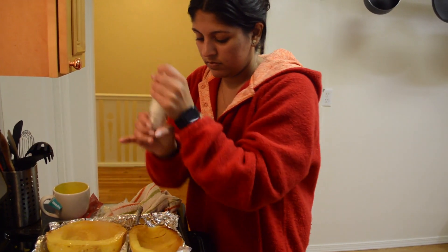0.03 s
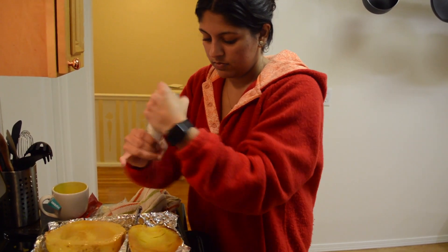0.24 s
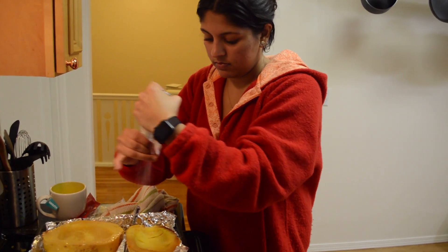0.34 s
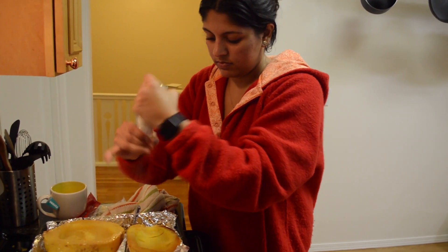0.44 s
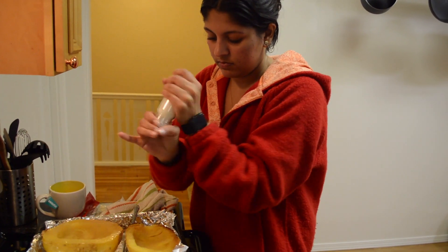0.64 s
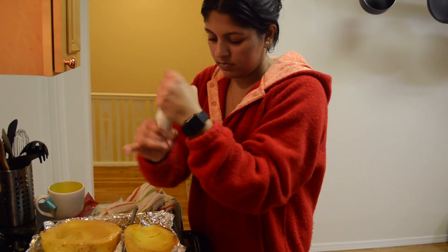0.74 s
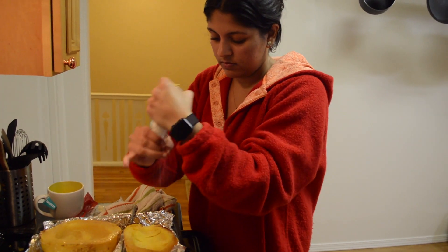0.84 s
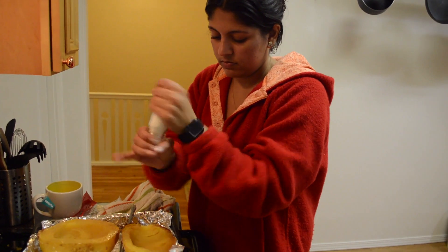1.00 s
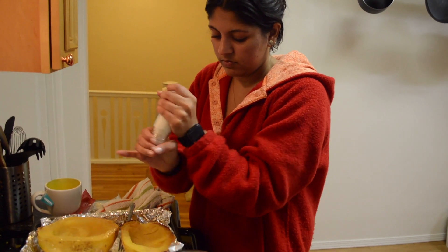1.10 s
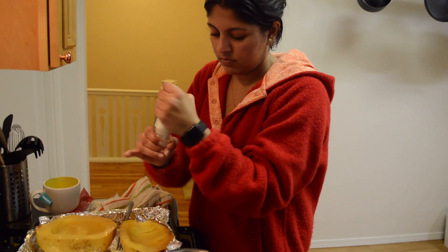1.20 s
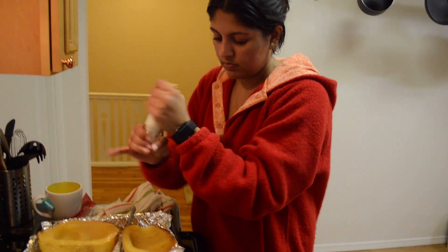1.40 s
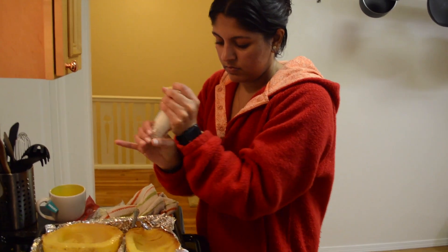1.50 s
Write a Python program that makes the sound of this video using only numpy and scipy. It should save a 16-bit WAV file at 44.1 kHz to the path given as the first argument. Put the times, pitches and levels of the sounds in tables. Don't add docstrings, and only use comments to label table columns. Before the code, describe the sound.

Gritty crunches of salt in a hand-twisted grinder, with loose grains ticking between turns in a kitchen

```python
import sys
import numpy as np
from scipy import signal
from scipy.fft import rfft, irfft
from scipy.io import wavfile
from scipy.ndimage import uniform_filter1d

SR = 44100
rng = np.random.default_rng(int(sys.argv[2]) if len(sys.argv) > 2 else 0)


def wav_record(signal):
    frames = np.transpose(np.atleast_2d(signal))
    bounded = np.clip(frames, -1, 1)
    quanta = np.round(bounded * 32767).astype(np.int16)
    wavfile.write(sys.argv[1], SR, quanta)


def field_ratio(decibels):
    return 10 ** (np.asarray(decibels, dtype=float) / 20)


N = 68355


def unit(x):
    return x / np.sqrt(np.mean(x ** 2))


def ring(x, hz, width_hz):
    hz = min(hz, SR / 2.2)
    q = max(hz / width_hz, 0.5)
    return signal.lfilter(*signal.iirpeak(hz, q, fs=SR), x)


def colour(x, outline):
    hz, db = np.array(outline, float).T
    f = np.maximum(np.fft.rfftfreq(4096, 1 / SR), 1)
    log_gain = np.interp(np.log(f), np.log(hz), db) * np.log(10) / 20
    cepstrum = irfft(log_gain)
    cepstrum[1:2048] *= 2
    cepstrum[2049:] = 0
    response = irfft(np.exp(rfft(cepstrum)))
    return signal.fftconvolve(x, response)[:len(x)]


def grit(shape, per_s, spread_db):
    chance = rng.random(shape)
    sign = rng.standard_normal(shape)
    size = np.minimum(rng.exponential(size=shape), 3)
    return unit((chance < per_s / SR) * sign * field_ratio(spread_db * size))


def crystals(table, per_s, spread_db, swell):
    crack_db, ring_share = -11.5, 0.14
    t = np.arange(SR // 8) / SR
    out = np.zeros((3, N + len(t)))
    grains = grit((len(table), len(t)), per_s, spread_db)
    for (start_s, db, hz, crumble_ms, body_db), grain in zip(table, grains):
        tau = max(crumble_ms, 0.2) / 1000
        attack = 1 - np.exp(-(t + 1 / SR) / (swell * tau))
        shape = np.exp(-t / tau) * attack
        burst = grain * shape
        burst = burst * np.sqrt(np.sum(shape ** 2) / np.sum(burst ** 2)) * field_ratio(db + crack_db)
        own_ring = 2 * ring(burst, hz, ring_share * hz)
        i = int(start_s * SR)
        out[:, i:i + len(t)] += [burst, own_ring, burst * field_ratio(body_db)]
    return out[:, :N]


# start_s, level_db (peak), pitch_hz (ring), crumble_ms, body_db
CRACK_EVENTS = [(.1944, -10, 10500, 10.3, 2.5), (.2035, -4.5, 10400, 3.5, -15), (.2333, 2, 4140, 8.3, -6),
                (.2495, -13, 6270, 3.6, 14), (.2693, 0.5, 6900, 6.5, 0.5), (.2804, -7.5, 7050, 8.3, 2),
                (.2972, -4.5, 10600, 11, -4), (.3347, 9, 10450, 1.1, -27), (.3432, 2, 10700, 2.8, -15),
                (.7078, -3, 8600, 2.1, -4), (.723, 1, 10200, 1.8, -6.5), (.7285, 6, 10000, 1.6, -15),
                (.7304, 1.5, 10400, 3.1, 0.5), (.738, 4.5, 11100, 4.4, -10.5),
                (.7543, -4, 10700, 0.92, 0.5), (.7614, 6.5, 10400, 1.1, -6), (.7653, 1, 10200, 2.7, -27),
                (.7697, 5.5, 10000, 3.3, -19), (.7847, -18, 11400, 4, -11), (.7946, 1, 10600, 0.29, -5),
                (1.1913, -26, 1900, 2.5, 11), (1.1997, -7.5, 2260, 2.5, -1), (1.2088, -11, 11000, 2.5, 4),
                (1.2378, -1.5, 3700, 3.7, -6)]


def cracks():
    return crystals(CRACK_EVENTS, per_s=16000, spread_db=6.3, swell=0.02)


# start_s, level_db (peak), pitch_hz (ring), crumble_ms, body_db
SMOOTH_EVENTS = [(.0156, -12.5, 6700, 3.7, -30), (.0865, -11, 7200, 5.9, -4),
                 (.0924, -11.5, 7360, 3.7, -25), (.3555, -15, 10500, 1.5, -15),
                 (.4594, -12, 14500, .6, -20), (.5227, -8, 7400, 9.6, -8.5), (.5459, -14.5, 7100, 10.7, 0),
                 (.6045, -9, 12000, 0.87, -15), (.681, -21, 10100, 0.67, -18.5),
                 (1.0452, -10, 8240, 6, -2.5), (1.1014, -13, 10600, 5.5, -16),
                 (1.127, -18.5, 9050, 4.6, -12), (1.218, -11, 2120, 5.2, 3), (1.227, -12, 4600, 5.7, 3),
                 (1.0165, -16.5, 10500, 14, -16), (1.2345, -11, 10100, 2.5, -18),
                 (1.242, -6.5, 10300, 6.5, -5), (1.2505, -3.5, 5900, 2.3, -9), (1.362, -18, 14000, 1, -27),
                 (1.4385, -13, 4960, 10, -12), (1.5425, -14, 10300, .6, -20)]


def smooth_snaps():
    return crystals(SMOOTH_EVENTS, per_s=16000, spread_db=2.3, swell=0.034)


# start_s, level_db (peak), pitch_hz (ring), crumble_ms, body_db
SHOWER_EVENTS = [(.307, -23, 10200, 4.8, -14), (.328, -7.5, 10400, 10, -26), (.432, -13, 1280, 4.1, -11),
                 (.565, -16.5, 7300, 15, -23), (.636, -13.5, 9500, 10.5, -22), (.657, -13, 10100, 13, -25),
                 (.69, -28, 11000, 5.5, -32), (.855, -11, 9600, 9.9, -35), (.9, -17, 10100, 25, -31),
                 (.972, -14, 10100, 10, -5), (1.03, -16, 2180, 12, 1.5), (1.062, -18, 2190, 16, -0.5),
                 (1.076, -17, 9500, 8.3, -18), (1.394, -21.5, 10000, 23, -21),
                 (1.485, -17.5, 2100, 8.6, -4), (1.515, -33.5, 2000, 12, 1), (1.533, -20, 7350, 7.4, -23)]


def showers():
    return 2 * crystals(SHOWER_EVENTS, per_s=22000, spread_db=0.99, swell=0.78)


# time_s, force_db, body_db
SCRAPE_FORCE = [(0, -34.5, -4), (.194, -39, -14), (0.199, -26.5, -3), (.27, -17.5, -24), (.35, -26, -1.5),
                (.46, -34.5, -7.5), (.63, -38.5, -6), (.72, -30, -48), (0.733, -15, -10),
                (.79, -23.5, -0.5), (.8, -23.5, -12), (.95, -35, -24), (1.07, -35, -16),
                (1.185, -37.5, -27), (1.212, -28, 2.5), (1.255, -31, -3.5), (1.38, -37.5, -14.5),
                (1.55, -35.5, -4.5)]


def scrape():
    time_s, force_db, body_db = np.array(SCRAPE_FORCE, float).T
    t = np.arange(N) / SR
    held = np.repeat(rng.standard_normal(N // 200 + 1), 200)[:N]
    steps_db = 1.4 * uniform_filter1d(held, size=60)
    rub = grit(N, 7000, 1.6) * field_ratio(np.interp(t, time_s, force_db) + steps_db)
    push = rub * field_ratio(np.interp(t, time_s, body_db))
    return np.array([rub, 0 * rub, push])


def grip_walk(seconds):
    k = int(seconds * SR)
    held = np.repeat(rng.standard_normal(N // 1000), k)[:N]
    return 1.2 * uniform_filter1d(held, k)


# pitch_hz, width_hz, level_db
BODY_MODES = [(630, 120, -21), (885, 450, -18), (1488, 73, 0), (1876, 269, 3.5), (2130, 570, 3.5),
              (2650, 215, 3), (3966, 560, -3.5), (4605, 465, 3)]


def hollow_body(push):
    grip_db = 1.2
    body = 0
    for k, (hz, width_hz, db) in enumerate(BODY_MODES):
        gripped = push * field_ratio(grip_db * grip_walk(0.04))
        body = body + (-1) ** k * field_ratio(db) * ring(gripped, hz, width_hz)
    return body


# pitch_hz, level_db (per Hz)
GRIT_SPECTRUM = [(300, -22.5), (1300, -20), (2500, -8.5), (4700, -6), (6640, 1.5), (8000, -1), (10500, 3),
                 (15500, -18)]


def grinder():
    air, own_ring, push = cracks() + smooth_snaps() + showers() + scrape()
    return field_ratio(5.5) * colour(air, GRIT_SPECTRUM) + field_ratio(4) * own_ring + field_ratio(9.5) * hollow_body(push)


# pitch_hz, decay_s
ECHO_DECAY = [(500, 0.5), (2000, 0.43), (6000, 0.16), (14000, 0.26)]


def echo_tail():
    gap_s = 0.0085
    t = np.arange(SR // 2) / SR
    hz, decay_s = np.array(ECHO_DECAY).T
    tail = np.zeros(len(t))
    for f in 250 * 2 ** np.arange(0, 6.1, 0.5):
        band = unit(ring(rng.standard_normal(len(t)), f, f / 2))
        fade = field_ratio(-60 * t / np.interp(np.log(f), np.log(hz), decay_s))
        tail += np.sqrt(f) * band * fade
    tail *= t > gap_s
    return tail / np.sqrt(np.sum(tail ** 2))


def kitchen(x):
    move_s, room_db, patterns = 0.035, -6, 6
    turn = np.arange(N) / SR / move_s
    wet = 0
    for k in range(patterns):
        share = np.sqrt(np.clip(1 - np.abs((turn - k) % patterns - 1), 0, 1))
        wet = wet + signal.fftconvolve(x * share, echo_tail())[:N]
    return x + field_ratio(room_db) * wet


# pitch_hz, level_db (per Hz)
HUM_SPECTRUM = [(20, -41), (70, -6.5), (160, -15), (260, -6.5), (660, -12.5), (850, -4.5), (4500, -9.5),
                (16000, -31.5)]


def hum():
    return unit(colour(rng.standard_normal(N), HUM_SPECTRUM)) * field_ratio(-38.5)


def scene():
    return (kitchen(grinder()) + hum())[None]


def band_limit(x):
    return signal.sosfilt(signal.butter(12, 15640, fs=SR, output="sos"), x)


def record(dry):
    limit = 1.02
    mix = limit * np.tanh(dry / limit)
    return band_limit(mix)


dry = scene()
out = record(dry)
wav_record(out)
```